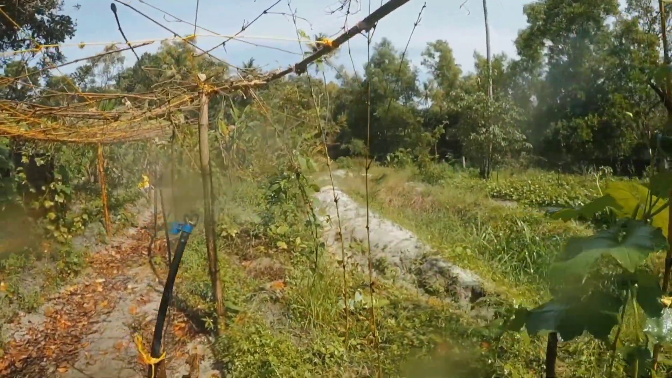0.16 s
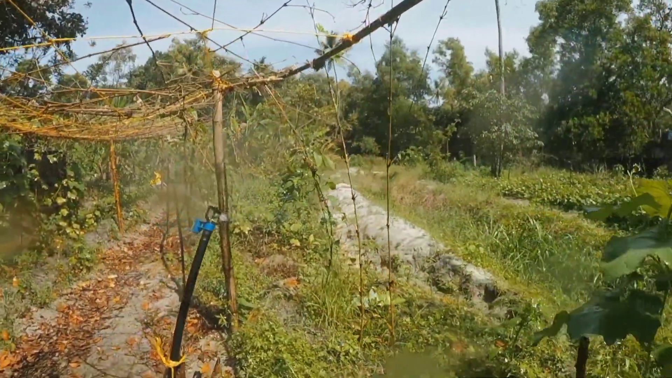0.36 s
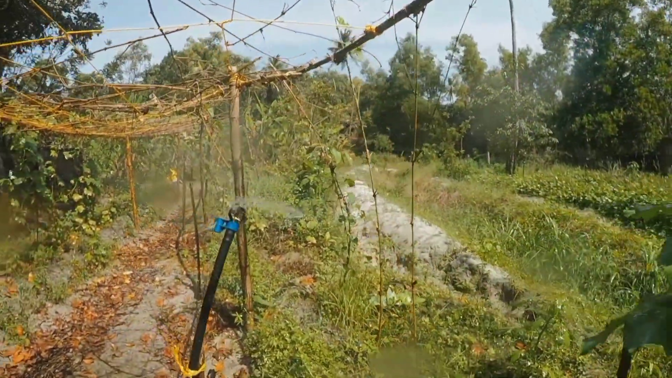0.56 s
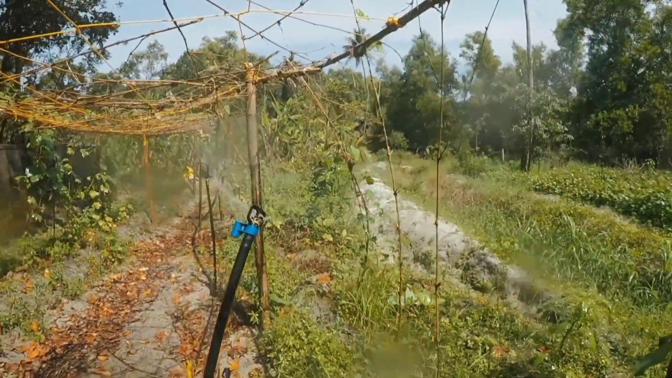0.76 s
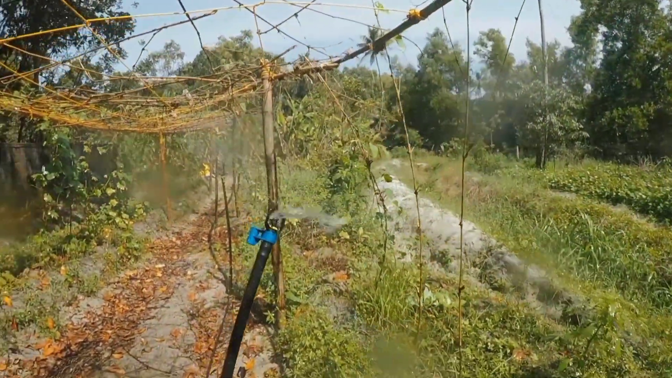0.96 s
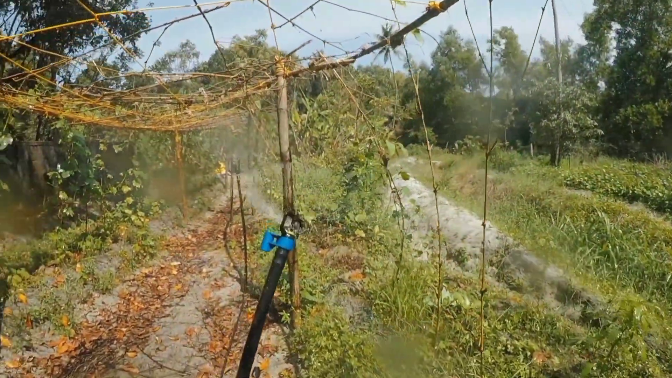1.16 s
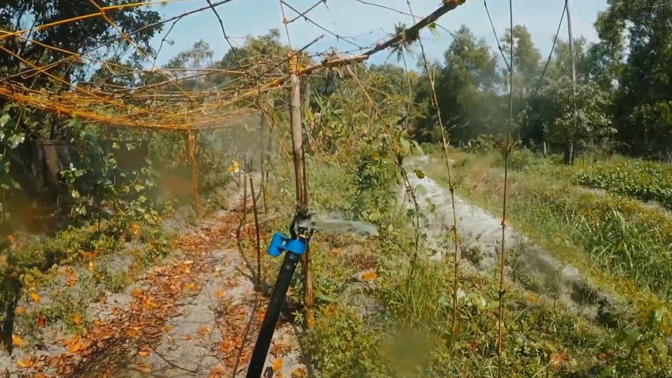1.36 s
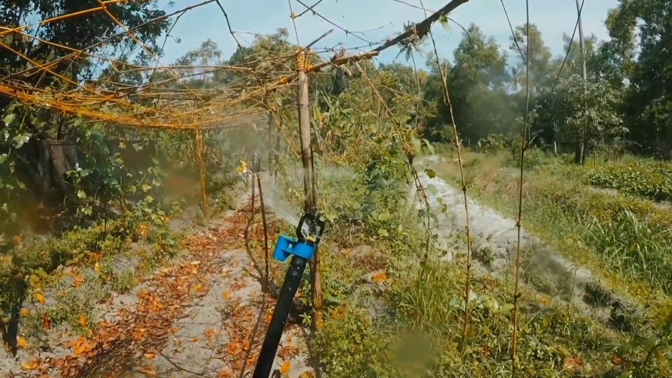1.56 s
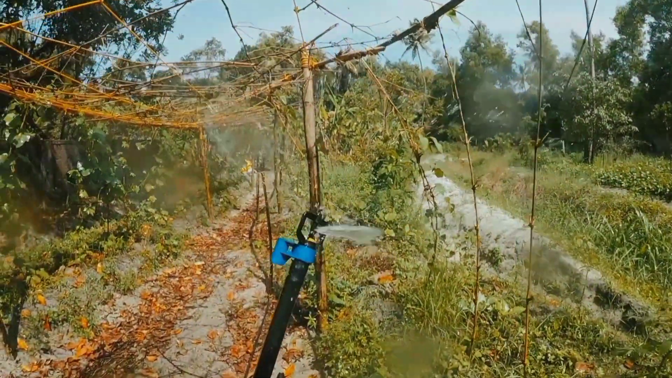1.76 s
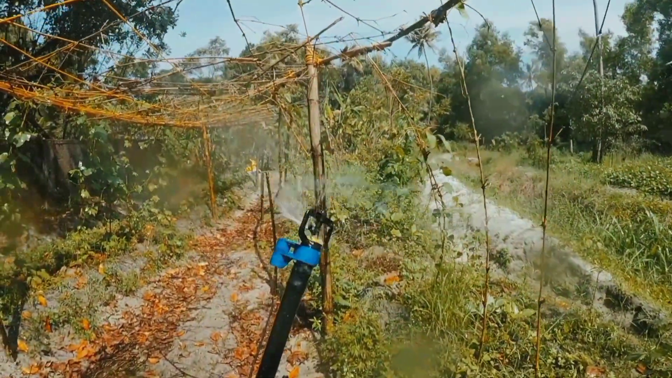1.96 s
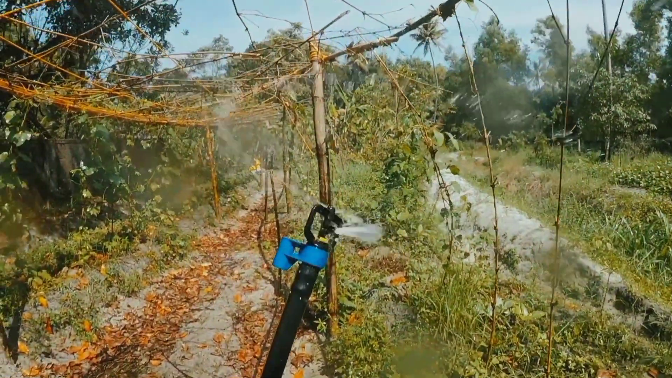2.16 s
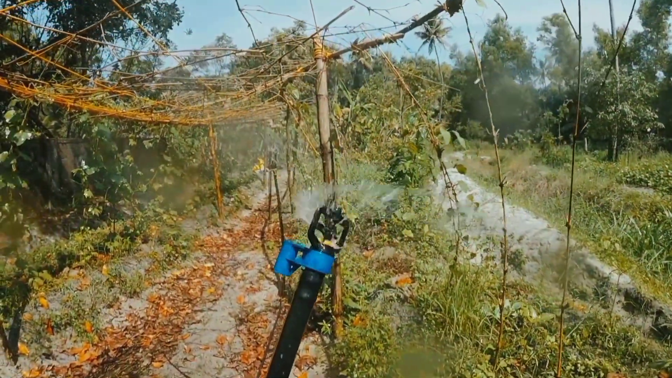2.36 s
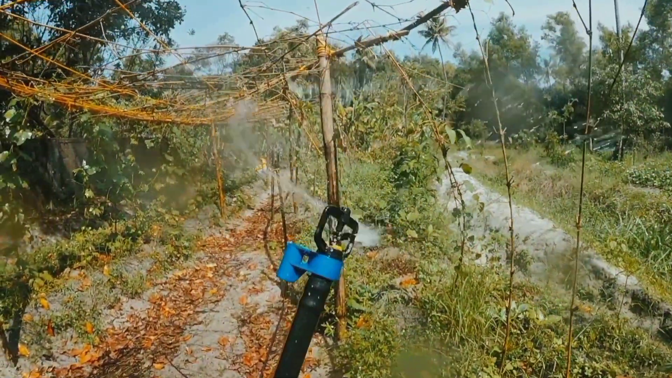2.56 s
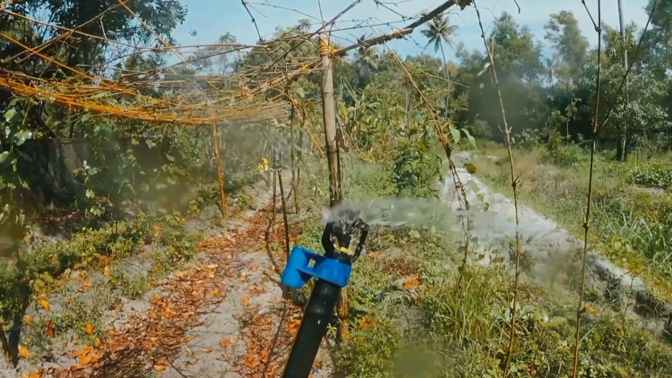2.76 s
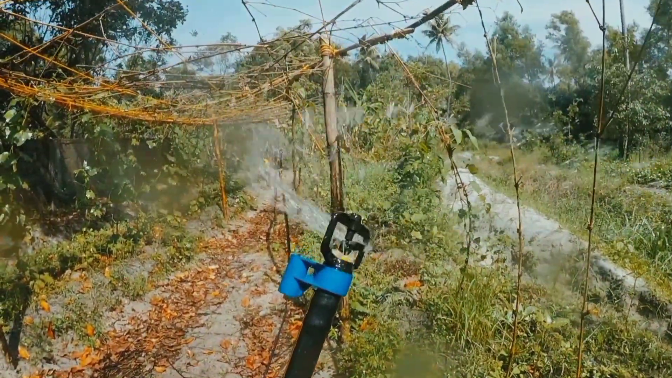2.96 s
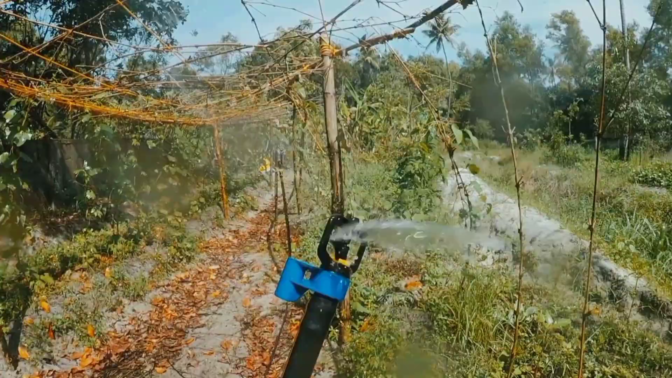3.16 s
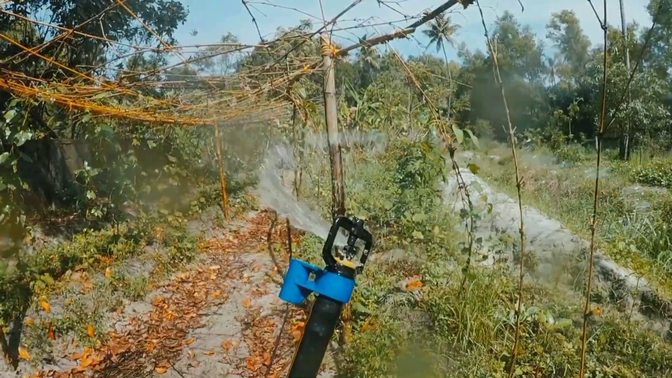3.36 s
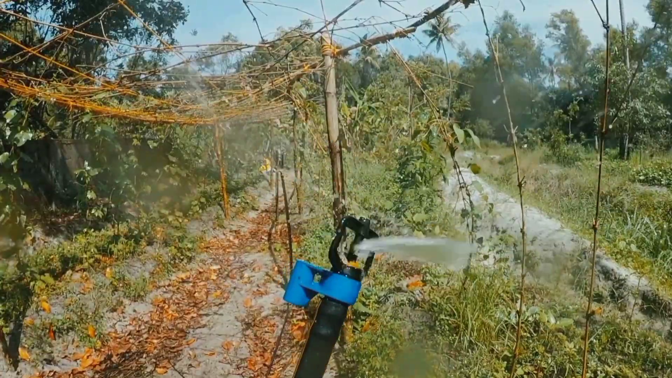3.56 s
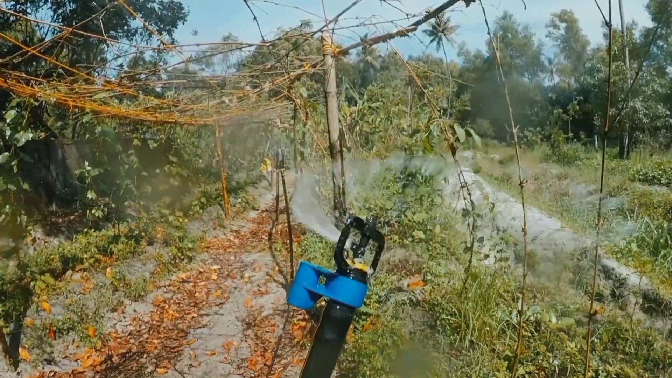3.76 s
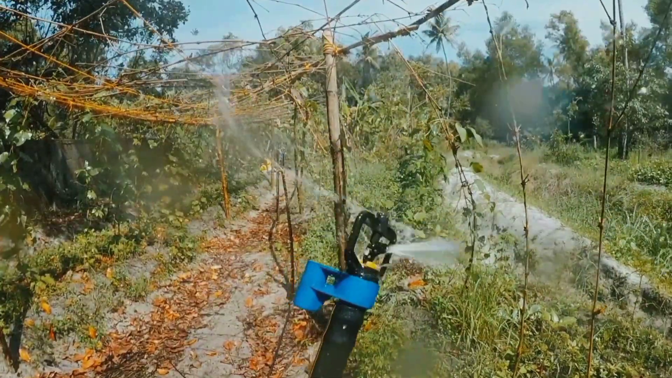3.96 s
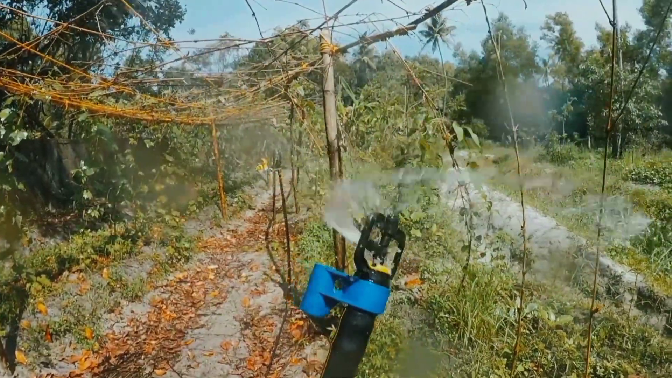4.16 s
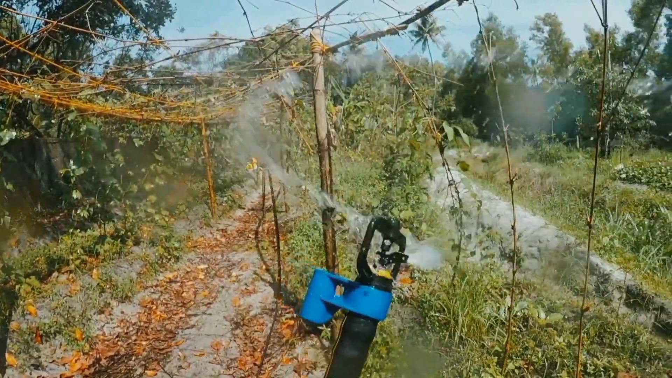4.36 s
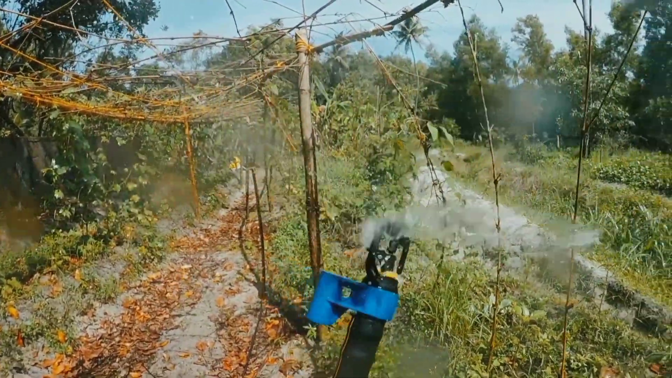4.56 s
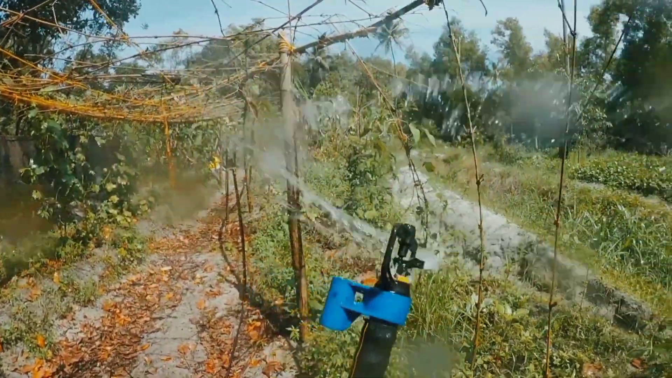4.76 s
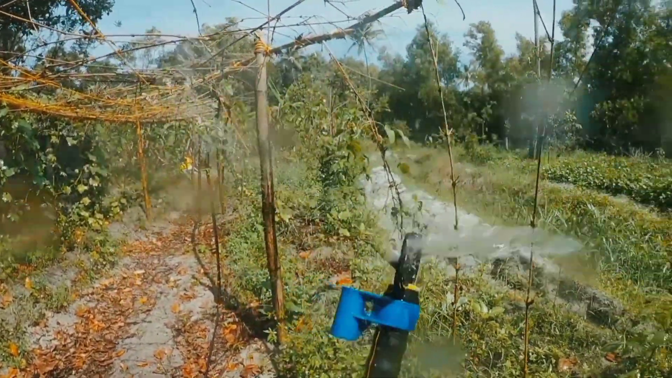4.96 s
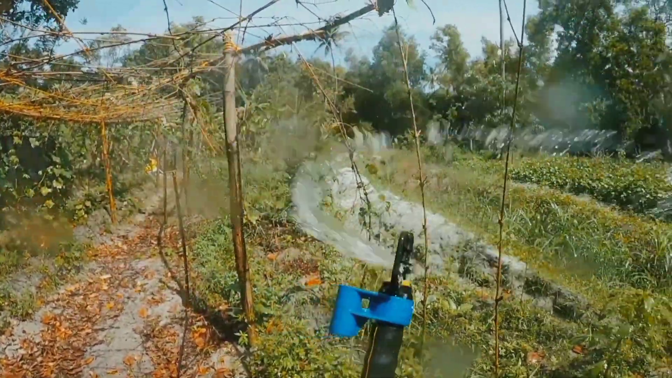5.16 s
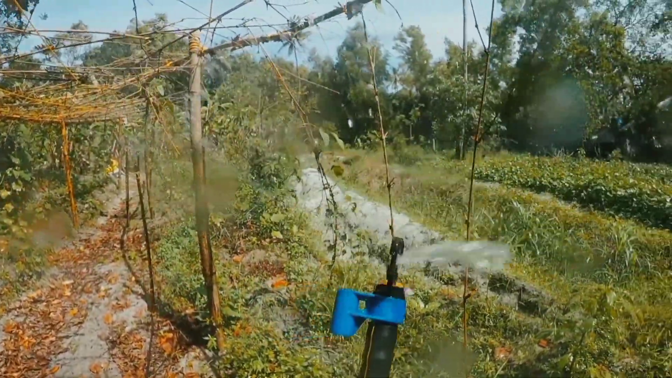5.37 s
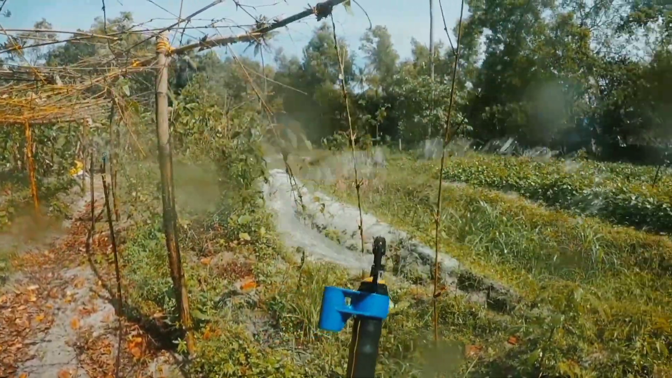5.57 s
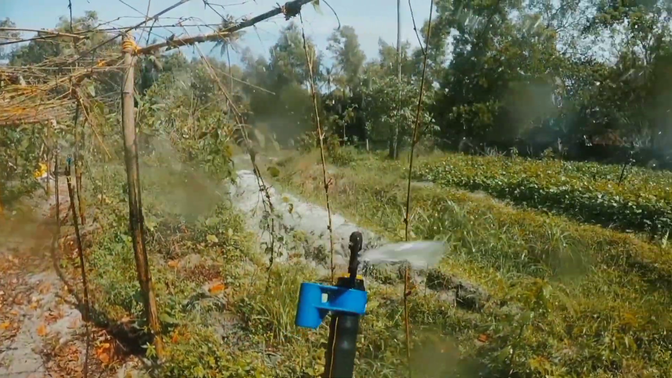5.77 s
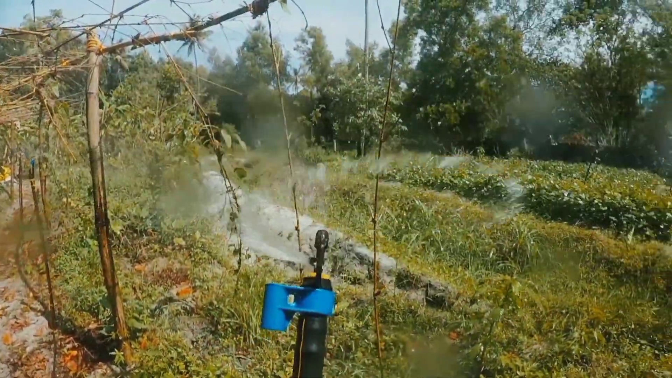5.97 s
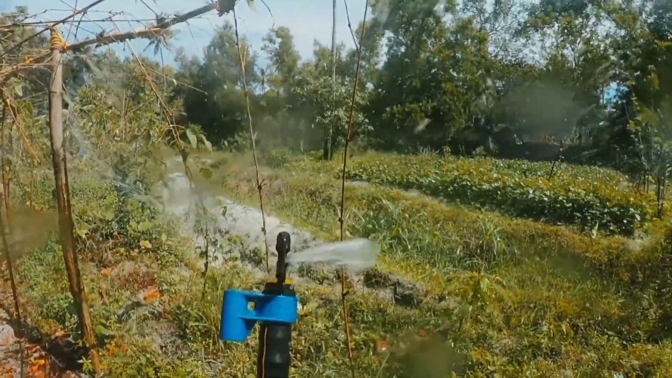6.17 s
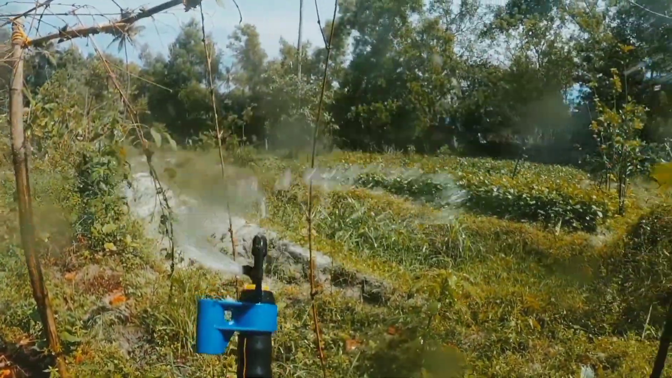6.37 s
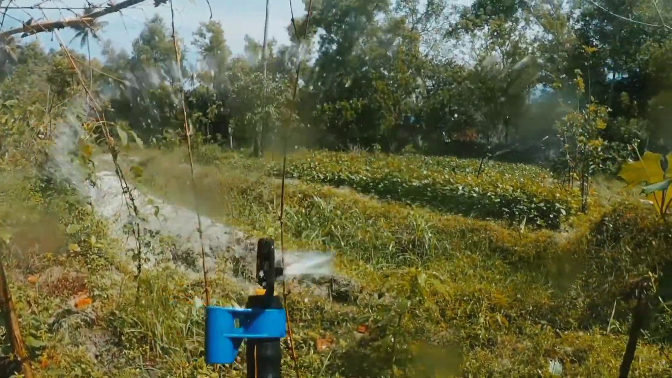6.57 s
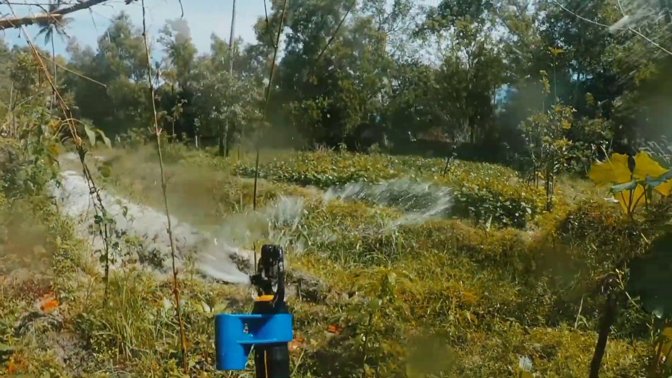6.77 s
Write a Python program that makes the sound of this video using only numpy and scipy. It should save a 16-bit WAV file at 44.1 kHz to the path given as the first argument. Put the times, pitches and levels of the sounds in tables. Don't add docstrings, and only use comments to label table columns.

```python
import sys
import numpy as np
from scipy import signal
from scipy.fft import rfft, irfft, next_fast_len
from scipy.io import wavfile
from scipy.ndimage import uniform_filter1d, map_coordinates

SR = 44100
rng = np.random.default_rng(int(sys.argv[2]) if len(sys.argv) > 2 else 0)


def gain_from_decibels(decibels):
    exponent = np.asarray(decibels, float) / 20
    return 10 ** exponent


def transcribe(u):
    v = np.clip(np.atleast_2d(u).T, -1, 1)
    q = np.round(v * 32767).astype(np.int16)
    wavfile.write(sys.argv[1], SR, q)


N = 300762
T = np.arange(N) / SR
SHAFT_HZ, HUM_HZ, NEIGHBOUR_HZ = 47.3, 192.7, 200.3


def unit(x):
    return x / np.sqrt(np.mean(x ** 2) + 1e-20)


def along(points, hz):
    f, v = np.transpose(points)
    return np.interp(np.log(hz + 1), np.log(f + 1), v)


def curves(rows):
    s, *cols = np.transpose(rows)
    return [np.interp(T, s, c) for c in cols]


def wobble(rate_hz):
    return map_coordinates(rng.standard_normal(int(N * rate_hz / SR) + 4), [T * rate_hz])


def filtered(x, response):
    m = next_fast_len(N + SR // 2)
    return irfft(rfft(x, m) * response(np.fft.rfftfreq(m, 1 / SR)), m)[..., :N]


def resonances(modes):
    def response(f):
        return sum((-1) ** k * gain_from_decibels(db) * 1j * f * w / (c * c - f * f + 1j * f * w)
                   for k, (c, w, db) in enumerate(modes))
    return response


def rush(spectrum, patchy_db):
    z = signal.stft(rng.standard_normal((2, N)), nperseg=512)[2]
    field = uniform_filter1d(rng.standard_normal(z.shape[1:]), size=6, axis=0)
    field = uniform_filter1d(field, size=8, axis=1)
    pair = signal.istft(z * gain_from_decibels(patchy_db * unit(field)), nperseg=512)[1][:, :N]
    return unit(filtered(pair, lambda hz: gain_from_decibels(along(spectrum, hz))))


def tone(hz, wander_rad):
    return np.sqrt(2) * np.cos(2 * np.pi * hz * T + wander_rad * wobble(3.9))


# t/s, level/dB
HUM_LEVEL = [(0.0, -20), (0.95, -18.5), (5.09, -22.5), (5.26, -19.5), (6.78, -19), (6.82, -18)]
# multiple of the hum, level/dB re hum
HUM_OVERTONES = [(2, -25.5), (3, -44)]


def motors():
    first_swell_s = 0.03
    turn = 2 * np.pi * HUM_HZ * T + 0.43 * wobble(2.7)
    hum = np.cos(turn) + sum(gain_from_decibels(db) * np.cos(k * turn) for k, db in HUM_OVERTONES)
    beat = 2 * np.pi * (NEIGHBOUR_HZ - HUM_HZ) * (T - first_swell_s)
    neighbour = np.cos(turn + beat + 0.83 * wobble(1.687))
    return np.sqrt(2) * gain_from_decibels(curves(HUM_LEVEL)[0]) * (hum + gain_from_decibels(-13) * neighbour)


# t/s, level/dB
NEARNESS = [(0.0, -45), (0.34, -46), (0.99, -45), (3.53, -40), (3.84, -41.5), (4.35, -40), (4.48, -42),
            (5.17, -43), (6.48, -43), (6.82, -42)]


def water_levels():
    near_db, = curves(NEARNESS)
    mean_db = near_db.mean()
    swing_db = near_db - mean_db
    jet_db = mean_db - 3.5 + 0.93 * swing_db
    leaves_db = mean_db - 0.33 + 0.99 * swing_db
    drops_per_s = 70 * gain_from_decibels(0.69 * swing_db)
    return jet_db, leaves_db, drops_per_s


# f/Hz, level/dB per Hz
JET_SPECTRUM = [(2650, -27), (4500, -13), (4970, -7), (6240, 0), (8000, -3.5), (10100, -4), (11100, -12),
                (12800, -11), (14200, -21.5), (16000, -36)]
# f/Hz, level/dB per Hz
LEAVES_SPECTRUM = [(400, 7), (800, -5.5), (1400, 0.5), (2300, -5.5), (2800, -3), (3500, -1.5), (4300, -4.5),
                   (5200, -14), (8000, -43)]


def spray():
    jet_db, leaves_db, _ = water_levels()
    stroke_db = 0.28 * np.cos(2 * np.pi * SHAFT_HZ * T)
    sputter = wobble(90)
    jet_db = jet_db + stroke_db + 0.49 * sputter + 1.14 * wobble(8.5)
    leaves_db = leaves_db + stroke_db + 2.0 * sputter + 0.23 * wobble(30)
    jet = gain_from_decibels(jet_db) * rush(JET_SPECTRUM, patchy_db=1.85)
    return jet + gain_from_decibels(leaves_db) * rush(LEAVES_SPECTRUM, patchy_db=2.0)


def hush(drops, depth, release_s):
    s, db = np.transpose(drops)[:2]
    blows = np.bincount(np.round((s + 0.0087) * SR).astype(int), gain_from_decibels(db), N)
    return 1 / (1 + depth * signal.lfilter([1], [1, -np.exp(-1 / (release_s * SR))], blows))


def fine_drops():
    _, leaves_db, drops_per_s = water_levels()
    count = np.cumsum(drops_per_s.clip(1)) / SR
    luck = rng.random((int(count[-1]), 7))
    s = np.interp(np.arange(len(luck)) + 3 * luck[:, 0], count, T)
    db = np.minimum(4 - 4 * np.log(luck[:, 1]), 17) + np.interp(s, T, leaves_db)
    note_hz = 1300 * gain_from_decibels(11 * luck[:, 6])
    modes_and_snap_db = [-15.0, -9.5, -15, -1.5] - 12 * luck[:, 2:6]
    return np.column_stack([s, db - 2.5, note_hz, modes_and_snap_db])


# t/s, peak level/dB, blow f/Hz, mesh snap
# level/dB re peak
LARGE_DROPS = [(0.064, -19.5, 1500, -23.5), (0.088, -27, 1350, -14), (0.103, -19.5, 1400, -26),
               (0.523, -17, 1230, -29), (0.533, -20, 1820, -28), (0.632, -17, 1600, -30),
               (1.092, -13.5, 1870, -23), (1.257, -19, 1310, -25), (1.33, -23.5, 1730, -22),
               (1.377, -18, 3700, -17), (1.462, -23, 3520, -19), (1.66, -18, 970, -14),
               (1.719, -16, 3280, -12.5), (1.809, -14.5, 2020, -27), (1.826, -15.5, 3640, -27),
               (1.848, -14.5, 3500, -23), (1.922, -17, 1800, -17), (2.023, -17, 1930, -23),
               (2.107, -24, 1150, -6), (2.201, -14, 1620, -15), (2.234, -25, 1350, -14),
               (2.294, -20, 3550, -14), (2.412, -10.5, 1580, -26), (2.42, -18, 1250, -11),
               (2.446, -8.5, 2090, -23), (2.69, -16.5, 2050, -9), (2.721, -16, 2150, -22),
               (2.765, -13, 4000, -11.5), (2.841, -6.5, 3850, -14), (2.875, -21, 1580, -12),
               (2.992, -15, 3960, -15), (3.01, -16.5, 2140, -13), (3.03, -20, 950, -9),
               (3.051, -12.5, 3970, -16), (3.15, -14.5, 1760, -11), (3.206, -18.5, 3460, -15),
               (3.24, -14.5, 1360, -13.5), (3.281, -21.5, 2390, -6), (3.324, -20, 1210, -19),
               (3.366, -18, 2100, -9), (3.409, -10, 1390, -9), (3.43, -19, 3550, -8),
               (3.446, -12, 3670, -11.5), (3.493, -14.5, 2100, -11), (3.516, -7.5, 1670, -19),
               (3.556, -15, 1420, -13), (3.575, -15.5, 3710, -17), (3.598, -14.5, 1820, -19),
               (3.626, -15.5, 1830, -15), (3.659, -17.5, 3760, -13), (3.813, -9, 1320, -13),
               (3.832, -18, 1020, -14), (3.852, -5.5, 950, -21), (3.856, -15, 1850, -13),
               (3.893, -3, 1540, -22), (3.959, -21.5, 3870, -18), (4.023, -16, 1990, -22),
               (4.083, -18, 3300, -8), (4.125, -5.5, 3890, -11.5), (4.172, -14, 3870, -19),
               (4.205, -15.5, 3750, -9), (4.251, -12, 3740, -17), (4.29, -11.5, 2240, -14),
                 (4.316, -19.5, 3220, -9), (4.386, -17.5, 1900, -7.5), (4.406, -15, 2120, -22),
                 (4.419, -17, 4190, -12), (4.438, -12.5, 1450, -9), (4.459, -23.5, 3030, -4),
                 (4.481, -10, 3920, -12), (4.526, -19, 3810, -10), (4.547, -9.5, 1370, -12),
                 (4.635, -20, 2130, -13), (4.654, -22, 1370, -6), (4.725, -6.5, 2000, -18.5),
                 (4.767, -23, 4060, -8), (4.845, -13, 3470, -19), (4.863, -11.5, 3870, -14),
                 (4.962, -12, 2390, -15.5), (4.983, -20.5, 1880, -18), (5.009, -21, 1200, -9),
                 (5.131, -15.5, 3580, -22), (5.232, -22, 999, -18), (5.324, -25, 950, -5.5),
                 (5.487, -16.5, 3550, -27), (5.535, -21, 2130, -17), (5.829, -12, 3540, -22),
                 (6.278, -2.5, 950, -28), (6.514, -24, 2000, -11), (6.584, -7.5, 2100, -17)]


def big_drops():
    s, db, hz, snap_db = np.transpose(LARGE_DROPS)
    octaves = np.abs(np.log2(np.transpose(SHELL_MODES)[0] / hz[:, None]))
    modes_db = -14.5 - 5 * octaves + 1 * rng.standard_normal(octaves.shape)
    return np.column_stack([s, db, hz, modes_db, snap_db - 1.5])


# f/Hz, t60/s
SHELL_MODES = [(1000, .008), (2000, .0075), (3600, .0045)]
SHELL_DB = [15, 18, 17.5]
# f/Hz, width/Hz, level/dB
MESH_MODES = [(6050, 1200, 3.5), (10200, 8600, -8.5)]


def ticks(rows):
    plop_db, plop_s, crack_db, crack_s = 2.5, 0.0042, 5.5, 0.0033
    t = np.arange(500) / SR
    s, db, note_hz, *modes_db, snap_db = np.transpose(rows)[:, :, None]
    dice = rng.standard_normal((len(rows), 12, 1))
    hiss = rng.standard_normal((len(rows), 4, len(t)))
    splash_gain = gain_from_decibels(np.minimum(-12 + 4 * dice[:, 0], -5))
    splash_after_s = 0.00283 * gain_from_decibels(4.64 * dice[:, 1]).clip(.3, 2.5)

    def fade(t60, after=0):
        return gain_from_decibels(-60 * (t - after) / t60) * (1 - np.exp(-(t - after).clip(0) / .00045))

    def burst(t60):
        return fade(t60) + splash_gain * fade(t60, splash_after_s)

    def size(wave):
        return np.linalg.norm(wave, axis=-1, keepdims=True)

    def steady(wave, t60):
        return wave * size(fade(t60)) / size(wave)

    where = np.round((s + .0001) * SR).astype(int) + np.arange(len(t))

    def lay(wave):
        return np.bincount(where.ravel(), (gain_from_decibels(db) * wave).ravel(), N + SR)[:N]

    rough = 1 + .3 * uniform_filter1d(hiss[:, 2], size=16) * np.sqrt(16)
    pitch = gain_from_decibels(.6 * dice[:, 2:5].clip(-1.5, 1.5))
    rings = []
    for k, (mode_db, level_db, (hz, t60)) in enumerate(zip(modes_db, SHELL_DB, SHELL_MODES)):
        wave = np.sin(2 * np.pi * hz * pitch[:, k] * t + 3 * dice[:, 5 + k])
        rings.append(gain_from_decibels(level_db - 4 + mode_db) * steady(burst(t60) * rough * wave, t60))
    plop = steady(burst(plop_s) * rough * np.sin(2 * np.pi * note_hz * t), plop_s)
    crack = steady(burst(crack_s) * hiss[:, 3], crack_s)
    splash = gain_from_decibels(plop_db) * plop + gain_from_decibels(crack_db) * crack
    lean = sum(.5 * dice[:, 8 + k].clip(-1.2, 1.2) * ring for k, ring in enumerate(rings))
    knocks = [lay(sum(rings) + splash), lay(lean + .3 * dice[:, 11] * splash)]
    soft_hammer = signal.butter(2, [700, 5500], "bandpass", fs=SR, output="sos")
    knocks = signal.sosfilt(soft_hammer, knocks)
    snaps = np.array([lay(gain_from_decibels(snap_db + 18.0) * steady(burst(0.0037) * hiss[:, k], 0.0052))
                      for k in range(2)])
    mesh = resonances(MESH_MODES)
    return knocks + filtered(snaps, lambda hz: mesh(hz) / np.sqrt(1 + (hz / 12000) ** 9))


# start t/s, end t/s, f/Hz, level/dB rms
INSECT_WHISTLES = [(.08, .25, 4515, -57), (.46, .66, 4500, -62), (.64, .72, 4500, -57),
                   (2.259, 2.472, 1490, -49), (2.304, 2.48, 1417, -49.5), (3.44, 3.618, 1470, -47.5),
                   (5.352, 6.205, 1400, -57)]


def insects():
    total = 0
    for start_s, end_s, hz, db in INSECT_WHISTLES:
        swell = np.clip(np.minimum(T - start_s, end_s - T) / 0.017, 0, 1)
        total = total + gain_from_decibels(db + 2.1 * wobble(23)) * swell * tone(hz, wander_rad=10.4)
    return total


def closed():
    depth_db, opens_s, opening_s = -37.5, 1.34, 0.47
    return depth_db * np.exp(-.15 * np.logaddexp(0, (T - opens_s) / .15) / opening_s)


# f/Hz, level/dB per Hz
RUMBLE_SPECTRUM = [(15, 10), (40, -1.5), (120, 1.5), (200, 0), (300, -2.5), (400, -13), (550, -27.5),
                   (800, -46), (1200, -81)]


def rumble():
    return gain_from_decibels(-21.5 + 0.058 * closed()) * rush(RUMBLE_SPECTRUM, patchy_db=0.98)


# multiple of the shaft rate, level/dB rms
HIGH_ORDERS = [(5, -37), (7, -55.5)]


def pump():
    hum_db, = curves(HUM_LEVEL)
    turn = 2 * np.pi * SHAFT_HZ * T + 0.71 * wobble(1.444)
    second_db = -25 - 0.84 * (hum_db - hum_db.mean()) + 0.42 * closed()
    third_db = -29.5 + 0.34 * closed()
    orders = [(1, -18), (2, second_db), (3, third_db)] + HIGH_ORDERS
    return -np.sqrt(2) * sum(gain_from_decibels(db) * np.cos(k * turn) for k, db in orders)


# f/Hz, phase/rad
LEFT_LEAD = [(20, 0), (220, -.3), (380, -1.1), (600, -2.7), (1150, -3.4), (1450, -4.1), (2100, -3.9),
             (2600, -4.3), (2850, -6), (5000, -5.6), (9000, -6.3)]
# f/Hz, level/dB
LEFT_RIGHT = [(60, -3.5), (110, -4.5), (200, -6), (380, -12), (700, -3.5), (1290, 0.5), (2380, 0.5),
              (4400, -5.5), (8120, -5.5), (15000, 4.5)]
# f/Hz, likeness/0-1
LIKENESS = [(200, 0.94), (330, 0.92), (480, 0.91), (1000, 0.45), (1700, 0.25), (2100, 0.01), (2700, 1),
            (3200, 0.28), (4200, 0.7), (5200, 0), (8000, 0.9), (10000, .35), (15000, 0.15)]


def ports(pair):
    def shape(hz):
        turn = np.arccos(np.clip(along(LIKENESS, hz), 0, 1)) / 2
        left = gain_from_decibels(along(LEFT_RIGHT, hz) / 2) * np.exp(.5j * along(LEFT_LEAD, hz))
        shared = np.cos(turn) * np.array([left, 1 / left])
        own = np.sin(turn) * np.array([left, -1 / left])
        return np.array([shared, own]) / np.hypot(abs(shared.mean(axis=0)), abs(own.mean(axis=0)))
    return filtered(pair[:, None], shape).sum(axis=0)


def scene():
    drops = big_drops()
    water = hush(drops, depth=1.7, release_s=0.0057) * spray() + ticks(np.vstack([drops, fine_drops()]))
    steady = np.array([motors() + insects() + pump(), np.zeros(N)])
    return ports(steady + rumble() + water)


def starved(x, floor_db, valley_db, scatter_db):
    hz, _, z = signal.stft([x[0] + x[1], x[0] - x[1]], SR, nperseg=1024)
    edges = np.arange(0, len(hz), 8)
    band_hz = hz[edges]
    level = 10 * np.log10(np.add.reduceat(abs(z) ** 2, edges, axis=1) + 1e-20)
    luck = uniform_filter1d(rng.standard_normal(level.shape), size=4, axis=2)
    level += scatter_db * unit(uniform_filter1d(luck, size=2, axis=1))
    usual = np.median(level, axis=2, keepdims=True)
    treble = (band_hz > 9000)[:, None] & (level < usual[:, 28:29] + floor_db)
    valley = np.abs(band_hz - [[700], [3100]]) < 50
    masked = valley[:, :, None] & (level < usual + valley_db)
    kept = np.repeat(~(treble | masked), 8, axis=1)[:, :len(hz)]
    mid, side = signal.istft(z * kept, SR, nperseg=1024)[1][:, :N] / 2
    return np.array([mid + side, mid - side])


def roll_off(x):
    return signal.sosfilt(signal.butter(12, 15690, fs=SR, output="sos"), x)


def record(dry):
    bass = filtered(dry, lambda hz: 1 / (1 + (hz / 138) ** 80))
    leak_spectrum = [(10, -10), (40, 0), (70, -3), (110, 0), (135, 6), (145, -60)]  # f/Hz, level/dB
    leak = gain_from_decibels(-49.5) * rush(leak_spectrum, patchy_db=2)[0]
    opened = dry + (gain_from_decibels(closed()) - 1) * bass + leak * gain_from_decibels([[-2.2], [1.8]])
    mix = starved(opened, floor_db=-9.5, valley_db=-3.5, scatter_db=4.5)
    return roll_off(mix)


dry = scene()
out = record(dry)
transcribe(out)
```